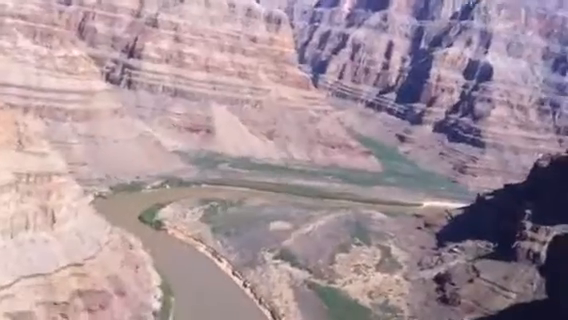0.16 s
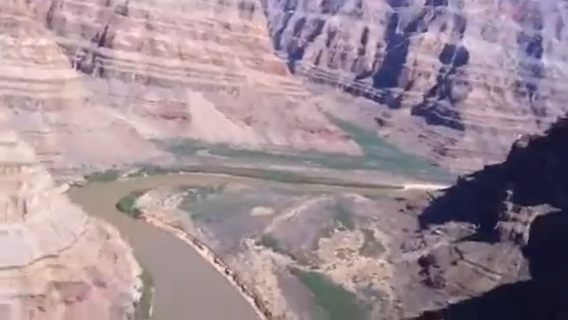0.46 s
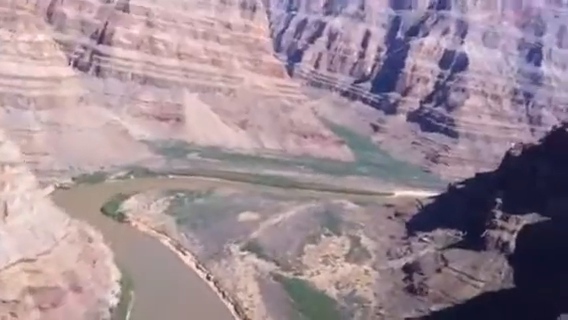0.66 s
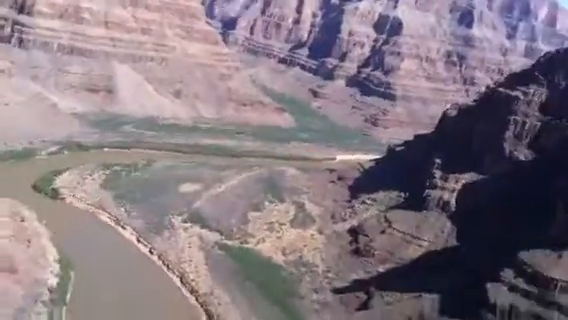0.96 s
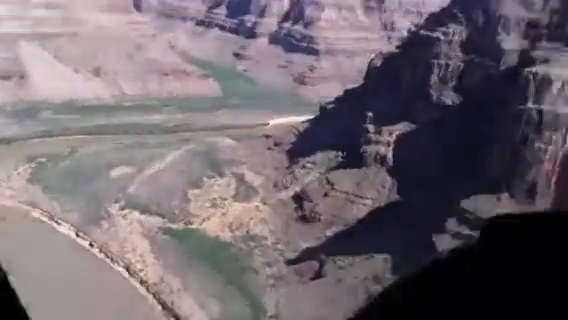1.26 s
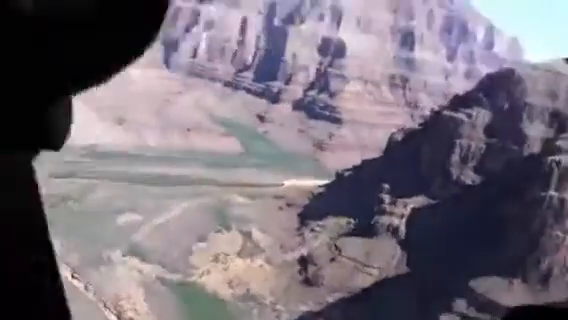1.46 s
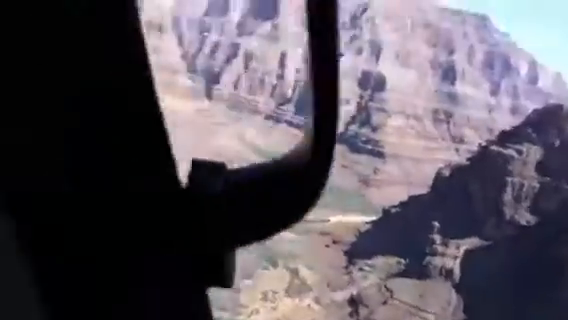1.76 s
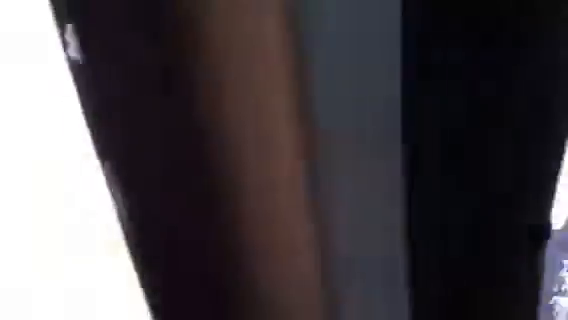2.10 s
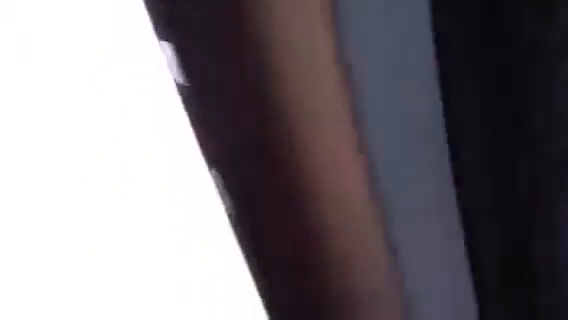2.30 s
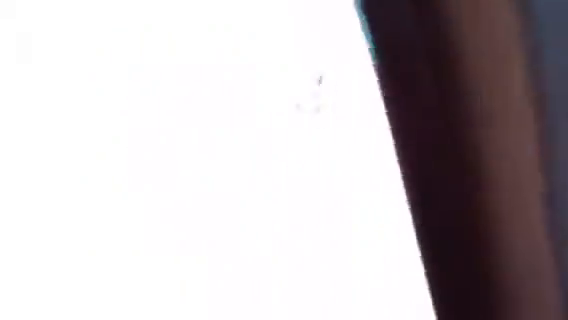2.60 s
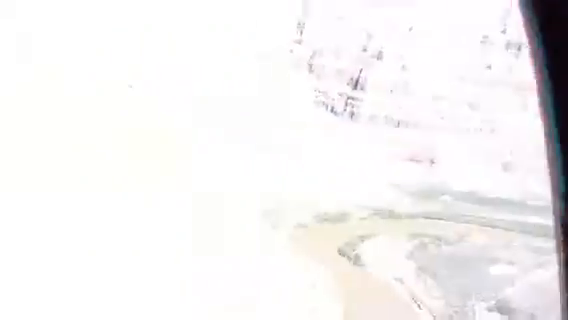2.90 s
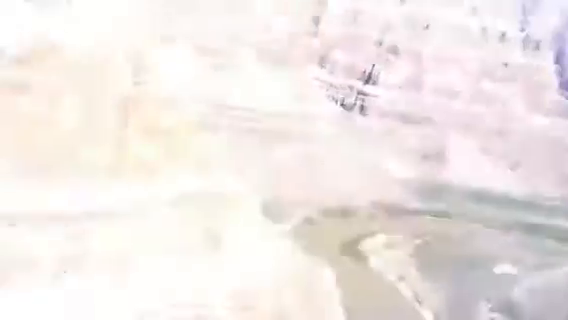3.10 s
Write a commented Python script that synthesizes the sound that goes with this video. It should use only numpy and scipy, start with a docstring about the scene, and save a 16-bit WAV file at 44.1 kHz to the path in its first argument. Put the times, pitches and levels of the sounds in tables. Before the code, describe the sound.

Helicopter drone heard from the cabin through a blocked microphone: dull throbbing rumble, low hum and faint gear whine. Near the end, grip ticks and dull bumps, a short partial opening, then a much louder, wavering airy roar.

```python
"""Air and engine roar fills a cruising helicopter: bands of noise that swell with every passing rotor blade.
The blades also thump the cabin (struck resonances); the rotors, shafts and gears hum and whine (wavering sines).
The microphone port is covered, probably by a finger, so all is muffled. Late on the grip shifts with small
ticks (clicks) and dull bumps (short rings), and the port opens twice, letting in the bright rush of the cabin.
"""
import sys
import numpy as np
from scipy import signal
from scipy.io import wavfile

SR = 44100
rng = np.random.default_rng(int(sys.argv[2]) if len(sys.argv) > 2 else 0)


def persist_wave(psi):
    """Save psi, clipped to +-1, as 16-bit WAV."""
    counts = np.round(np.clip(psi, -1, 1) * 32767).astype(np.int16)
    wavfile.write(sys.argv[1], SR, np.atleast_2d(counts).T)


N = 143325
TIME = np.arange(N) / SR  # seconds
BLADE_HZ, FIRST_BLADE_S = 19.44, 0.00856  # blades per second, moment of the first one


def from_db(db):
    """Turn decibels into a gain."""
    return 10 ** (np.asarray(db) / 20)


def rms_one(x):
    """Scale a sound to an rms of 1."""
    return x / np.sqrt(np.mean(x ** 2) + 1e-20)


def in_time(rows):
    """Draw straight lines between the rows of a table, giving each column a value at every sample."""
    seconds, *columns = np.transpose(rows)
    return [np.interp(TIME, seconds, column) for column in columns]


def drift(rate_hz):
    """Random wandering with a spread of 1: noise smoothed by a low-pass at the given rate."""
    step = 40  # samples between the computed points
    r = np.exp(-2 * np.pi * rate_hz * step / SR)
    noise = rng.standard_normal(N // step + 2002)
    slow = signal.lfilter([1], [1, -2 * r, r * r], noise)[2000:]  # skip the filter's start
    return np.interp(np.arange(N) / step, np.arange(len(slow)), rms_one(slow))


def filtered(x, order, hz, kind):
    """Pass a sound through a smooth (Butterworth) filter."""
    return signal.sosfilt(signal.butter(order, hz, kind, fs=SR, output="sos"), x)


def ring(clicks, hz, t60_s):
    """A resonance: each click starts a sine that dies away by 60 dB in t60_s."""
    r = np.exp(-np.log(1000) / (t60_s * SR))
    w = 2 * np.pi * hz / SR
    return signal.lfilter([0, np.sin(w)], [1, -2 * r * np.cos(w), r * r], clicks + 1e-18)


def tone(hz):
    """A sine of rms 1 whose pitch may move."""
    cycles = np.cumsum(hz) / SR + rng.random()
    return np.sqrt(2) * np.sin(2 * np.pi * cycles)


def impulses(rows):
    """One single-sample click for each row of time and level."""
    clicks = np.zeros(N)
    for seconds, db in rows:
        clicks[int(seconds * SR)] = from_db(db)
    return clicks


# How far the port is open; higher is wider: (time [s], opening [dB])
GAP = [(2.2, -81), (2.37, -46.5), (2.44, -36.5), (2.48, -14.5), (2.525, -13), (2.565, -37), (2.605, -33),
       (2.64, -32), (2.7, -41), (3.03, -40.5), (3.044, -9.5), (3.066, 7), (3.092, 1), (3.122, -13),
       (3.18, -4), (3.205, -10), (3.225, -17), (3.25, -24)]


def port_opening():
    """The moving gap at the microphone port, which lets in loudness and treble as it widens."""
    return in_time(GAP)[0]


# Extra bass through the open port: (time [s], level [dB])
OPEN_BASS = [(2.4, 8), (2.5, 2.5), (2.7, 1), (3.05, 2.5), (3.09, -5.5), (3.125, -10), (3.19, -8),
             (3.215, 3), (3.25, -8)]
OPEN_BASS_EDGE_HZ = 200
OPEN_CORNER_HZ, GAP_SLOPE = 4250, 2.31  # treble corner at an opening of 0 dB, steepness above it
CORNER_FOLLOWS, LEVEL_FOLLOWS = 0.82, .16  # dB of corner and of overall level per dB of opening


def through_gap(hz, gap_db):
    """Gain of one frequency through the gap: a low-pass whose corner falls as the gap narrows."""
    corner = OPEN_CORNER_HZ * from_db(CORNER_FOLLOWS * gap_db)
    bass_db, = in_time(OPEN_BASS)
    bass_share = 1 / (1 + (hz / OPEN_BASS_EDGE_HZ) ** 4)
    level_db = LEVEL_FOLLOWS * gap_db + bass_db * bass_share
    return from_db(level_db) / np.sqrt(1 + (hz / corner) ** GAP_SLOPE)


def at_the_port(hz, covered_db, open_db, swell_db, gap_db):
    """Level of a tone: its path through the cover and its path through the gap add as powers."""
    return np.hypot(from_db(covered_db + swell_db), from_db(open_db) * through_gap(hz, gap_db))


# Gear whines: (pitch at full speed [Hz], rms through the cover before its swell [dB],
# rms through the port before the gap acts [dB])
WHINES = [(643, -57, -45), (1288, -66, -46), (1718, -65, -34), (1952, -88, -44), (2337, -90, -45),
          (2942, -92, -46)]
# Gear speed: (time [s], share of full speed [1])
GEAR_SPEED = [(0, .997), (1.4, 1.0), (2.3, .999), (2.6, .995), (3.06, .99), (3.25, .989)]
# Swell of the whines through the cover: (time [s], level [dB])
WHINE_LEVEL = [(0, -6), (.9, -2), (1.4, 1.5), (1.9, 1), (2.2, 0), (2.7, 4), (3.25, 3)]
WHINE_WAVER_DB, WHINE_WANDER = 0.5, .0005  # spread of level, spread of pitch as a share of full speed


def gear_whine(gap_db):
    """Thin gearbox sines that follow the gear speed, faint under the cover, clear when the port opens."""
    speed, = in_time(GEAR_SPEED)
    swell_db, = in_time(WHINE_LEVEL)
    out = 0
    for hz, covered_db, open_db in WHINES:
        level = at_the_port(hz, covered_db, open_db, swell_db, gap_db)
        waver = from_db(WHINE_WAVER_DB * drift(14))
        pitch = hz * (speed + WHINE_WANDER * drift(10.4))
        out = out + level * waver * tone(pitch)
    return out


# Hum of the rotors and shafts: (pitch [Hz], rms through the cover before its swell [dB],
# rms through the port before the gap acts [dB])
HUMS = [(66, -53.5, -45), (96.8, -40, -33), (116.7, -41, -30.5), (137.9, -34, -22.5), (243.4, -45, -33.5),
        (279.7, -46, -29.5)]
# Swell of the hum through the cover: (time [s], level [dB])
HUM_LEVEL = [(0, 2.5), (.2, 0.5), (1.0, 1), (1.3, -3.5), (2.3, -7.5), (2.65, -5), (3.25, -11)]
HUM_WAVER_DB, HUM_WANDER_HZ = 4, 0.62  # spread of level and of pitch


def hum(gap_db):
    """Low sines of the rotors and shafts, wavering in level and pitch, stronger when the port opens."""
    swell_db, = in_time(HUM_LEVEL)
    out = 0
    for hz, covered_db, open_db in HUMS:
        level = at_the_port(hz, covered_db, open_db, swell_db, gap_db)
        waver = from_db(HUM_WAVER_DB * drift(16))
        pitch = hz + HUM_WANDER_HZ * drift(1.13)
        out = out + level * waver * tone(pitch)
    return out


HOLLOW_HZ, HOLLOW_T60_S = 359, 0.071
HOLLOW_DB, HOLLOW_FOLLOWS = -17.5, 0.53  # rms at an opening of 0 dB, dB per dB of opening


def hollow(gap_db):
    """The hollow under the lifted cover: noise rings one resonance, louder as the gap widens."""
    ringing = rms_one(ring(rng.standard_normal(N), HOLLOW_HZ, HOLLOW_T60_S))
    return from_db(HOLLOW_DB + HOLLOW_FOLLOWS * gap_db) * ringing


# Ticks of the grip on the case: (time [s], peak level [dB])
TICKS = [(2.363, -26.5), (2.378, -40), (2.613, -38), (2.87, -40)]
# Low bumps as the cover lifts: (time [s], strength of the push [dB])
BUMPS = [(2.476, -12), (3.042, -8)]
TICK_DULL_HZ = 1800
BUMP_HZ, BUMP_T60_S = 167.7, 0.11


def handling():
    """Dry ticks of the grip (softened clicks), and a dull ringing bump each time the cover lifts."""
    softening = np.exp(-2 * np.pi * TICK_DULL_HZ / SR)
    ticks = signal.lfilter([1], [1, -softening], impulses(TICKS))
    bumps = ring(impulses(BUMPS), BUMP_HZ, BUMP_T60_S)
    return ticks + filtered(bumps, 2, BUMP_HZ / 2, "high")


# Cabin resonances struck by the blades: (pitch [Hz], relative strength [dB], time to fade by 60 dB [s])
CABIN_MODES = [(118, -5, 0.16), (171, 1, .035), (220, 1.5, 0.056), (269.7, -2, 0.15), (372, -5.5, 0.037),
               (470, -8, 0.036)]
THUMP_DB, THUMP_SPREAD_DB = -32, 2  # rms of all thumps, random spread of each push


def blade_thumps():
    """Every passing blade pushes on the cabin and rings its low resonances, never twice alike."""
    times = np.arange(FIRST_BLADE_S, TIME[-1], 1 / BLADE_HZ)
    samples = (times * SR).astype(int)
    out = 0
    for k, (hz, db, t60_s) in enumerate(CABIN_MODES):
        pushes = np.zeros(N)
        pushes[samples] = from_db(db + THUMP_SPREAD_DB * rng.standard_normal(len(times)))
        out = out + (-1) ** k * ring(pushes, hz, t60_s)  # neighbours swing in opposite directions
    return from_db(THUMP_DB) * rms_one(filtered(out, 2, [90, 520], "band"))


def band_gains(spectrum, centres):
    """Gains of equal-ratio noise bands that follow a spectrum, with a total power of 1."""
    hz, db = np.transpose(spectrum)
    density = from_db(np.interp(np.log(centres), np.log(hz), db))
    gains = density * np.sqrt(centres)  # higher bands are wider, so they hold more power
    return gains / np.linalg.norm(gains)


# Tone colour of the roar through the cover: (pitch [Hz], relative power per Hz [dB])
COVERED = [(25, -39.5), (50, -28), (75, -23.5), (110, -8), (170, 4.5), (250, -4.5), (400, -10),
           (600, -18.5), (800, -25), (1100, -28), (1550, -35.5), (2000, -38), (2350, -42), (2750, -44),
           (3300, -53), (4500, -59), (7000, -63.5), (11000, -69), (15500, -67.5)]
# Tone colour of the roar through the open port: (pitch [Hz], relative power per Hz [dB])
OPEN = [(25, -47), (60, -29.5), (100, -9), (150, 2), (250, -3.5), (370, -6), (480, -8), (620, -10.5),
        (950, -16), (1700, -19.5), (2700, -21), (4000, -26), (6500, -31.5), (9000, -34.5), (10500, -42.5),
        (13000, -41.5), (15500, -44)]
# Swell of the muffled roar: (time [s], bass only [dB], all pitches, doubling toward the treble [dB])
COVERED_LEVEL = [(0, 0.5, 0.5), (.3, -2, 0.66), (.75, 0, 0.5), (1.2, -1, -0.5), (1.7, 4, -0.5), (2.1, 2, 0),
                 (2.3, 4.5, 1), (2.8, -1, 1), (3.25, -1, 1)]
COVERED_DB, OPEN_DB = -27.5, -12.5  # rms of each path before its swell or gap
BASS_EDGE_HZ = 250
THROB_DB, THROB_HZ, THROB_OCTAVES = 1.5, 304, 0.89  # blade swell, the pitch it centres on, its width
BUFFET_DB, BUFFET_PER_S = -0.47, 22  # turbulence makes the bass lumpy
FLICKER_DB, FLICKER_PER_S = 0.55, 24  # each band flickers by itself


def roar(gap_db):
    """Air and engine noise in third octaves, throbbing with the blades, through the cover and the gap."""
    edges = 22 * 2 ** (np.arange(30) / 3)
    centres = np.sqrt(edges[1:] * edges[:-1])
    covered, opened = band_gains(COVERED, centres), band_gains(OPEN, centres)
    bass_db, wide_db = in_time(COVERED_LEVEL)
    blade = np.cos(2 * np.pi * BLADE_HZ * (TIME - FIRST_BLADE_S))
    buffet_db = BUFFET_DB * drift(BUFFET_PER_S)
    white = rng.standard_normal((2, N))
    out = 0
    for k, hz in enumerate(centres):
        # Neighbouring bands take turns between two independent noises.
        band = rms_one(filtered(white[k % 2], 3, edges[k:k + 2], "band"))
        bass = 1 / (1 + (hz / BASS_EDGE_HZ) ** 2)  # near 1 in the bass, near 0 in the treble
        swell_db = bass * (bass_db + buffet_db) + (2 - bass) * wide_db
        muffled = covered[k] * from_db(COVERED_DB + swell_db)
        direct = opened[k] * from_db(OPEN_DB) * through_gap(hz, gap_db)
        octaves_away = np.log2(hz / THROB_HZ)
        throb_db = THROB_DB * np.exp(-.5 * (octaves_away / THROB_OCTAVES) ** 2) * blade
        flicker_db = FLICKER_DB * drift(FLICKER_PER_S)
        out = out + band * np.hypot(muffled, direct) * from_db(throb_db + flicker_db)
    return out


def scene():
    """All the cabin sounds as they reach the microphone behind its moving cover."""
    gap_db = port_opening()
    background = gear_whine(gap_db) + hum(gap_db) + hollow(gap_db)
    return (background + handling() + blade_thumps() + roar(gap_db))[None]


OVERLOAD = 0.99  # the level that rounded peaks approach
RUMBLE_CUT_HZ, CUTOFF_HZ = 60, 15800


def record(dry):
    """Round the peaks, then cut the deepest rumble and the very top."""
    rounded = OVERLOAD * np.tanh(dry / OVERLOAD)
    thinned = filtered(rounded, 2, RUMBLE_CUT_HZ, "high")
    return signal.sosfilt(signal.ellip(12, .1, 90, CUTOFF_HZ, fs=SR, output="sos"), thinned)


dry = scene()
out = record(dry)
persist_wave(out)
```